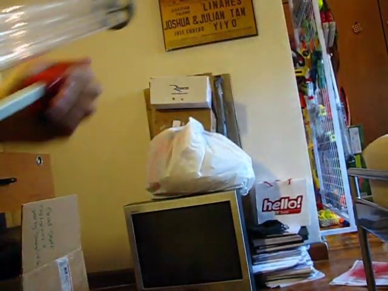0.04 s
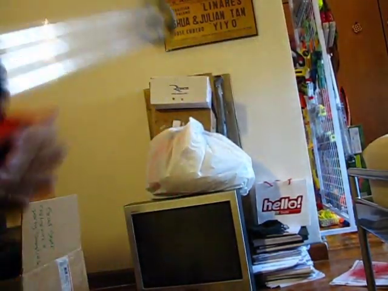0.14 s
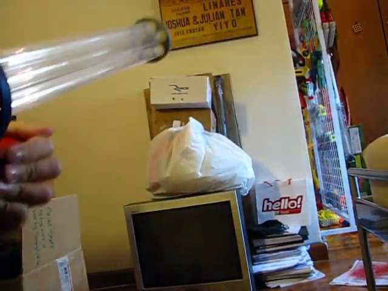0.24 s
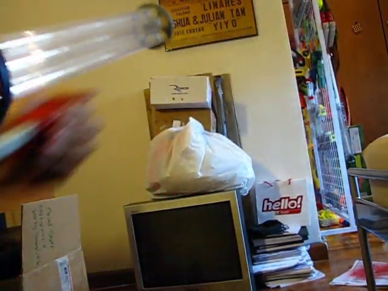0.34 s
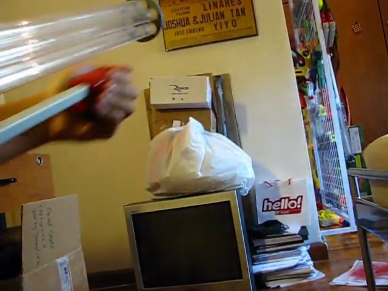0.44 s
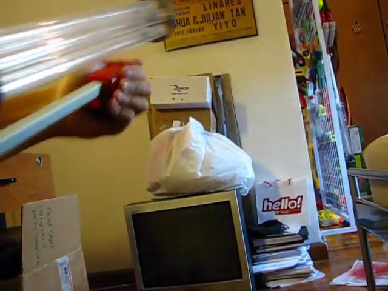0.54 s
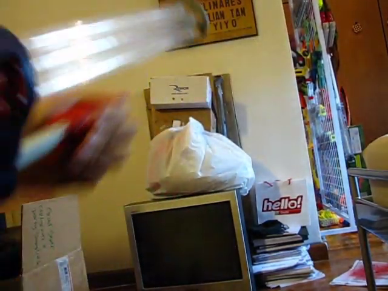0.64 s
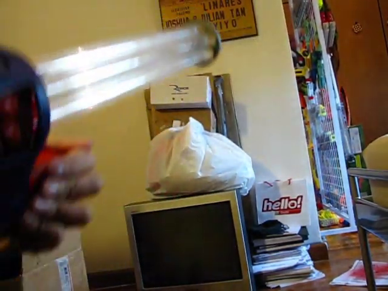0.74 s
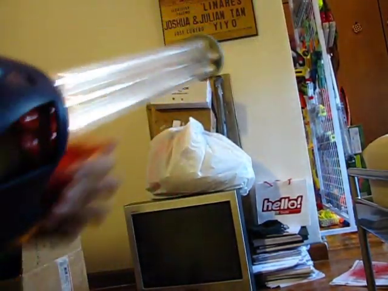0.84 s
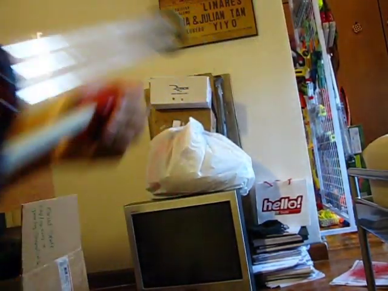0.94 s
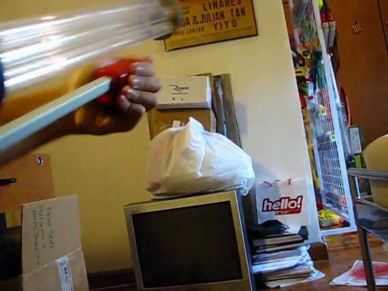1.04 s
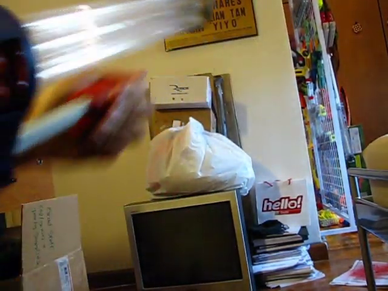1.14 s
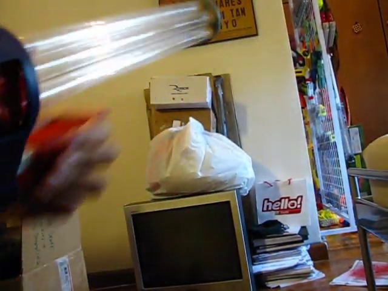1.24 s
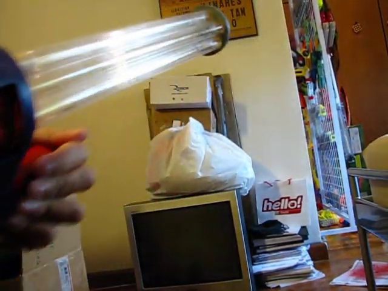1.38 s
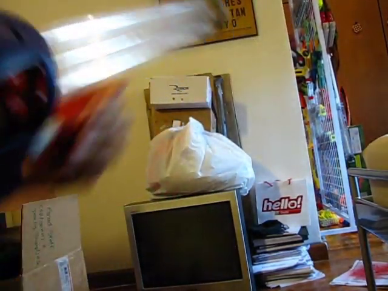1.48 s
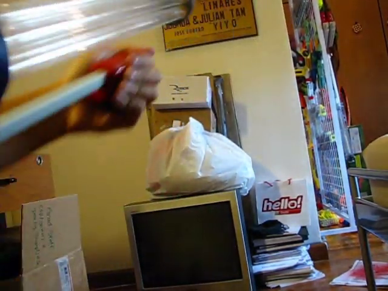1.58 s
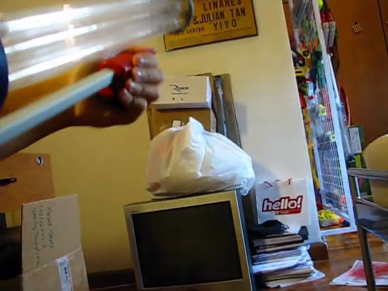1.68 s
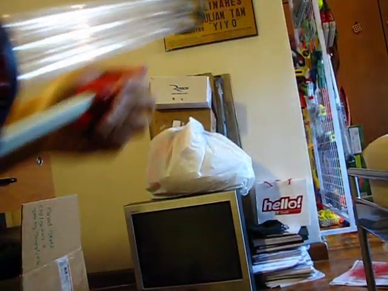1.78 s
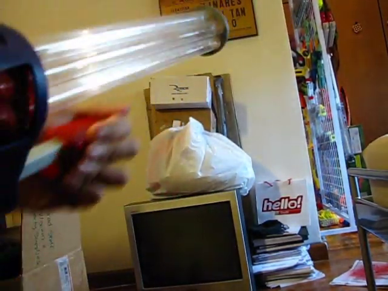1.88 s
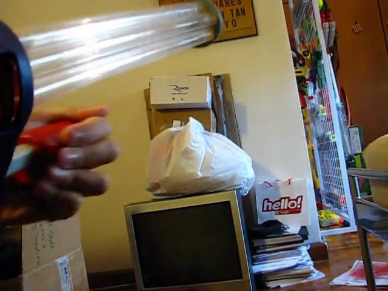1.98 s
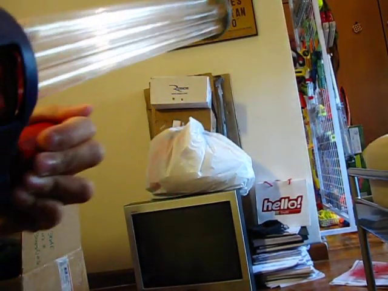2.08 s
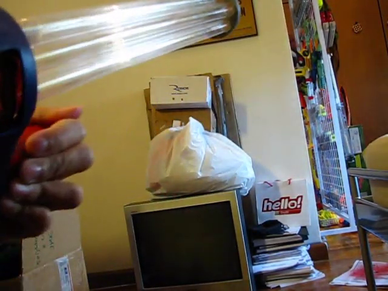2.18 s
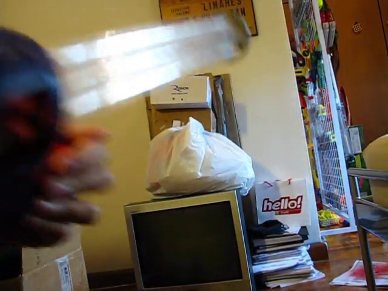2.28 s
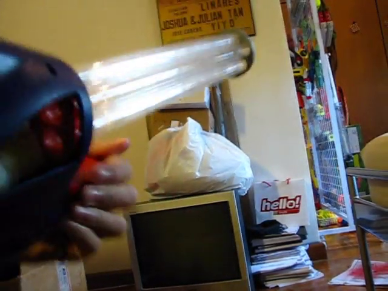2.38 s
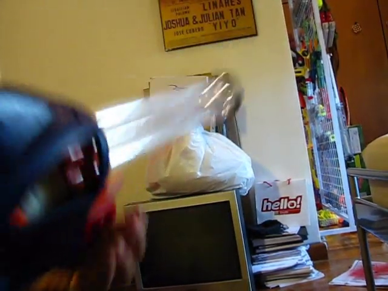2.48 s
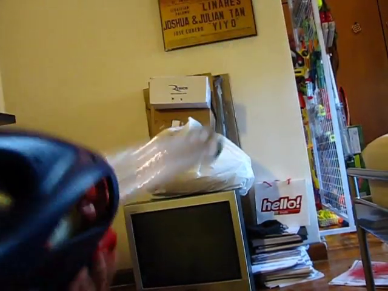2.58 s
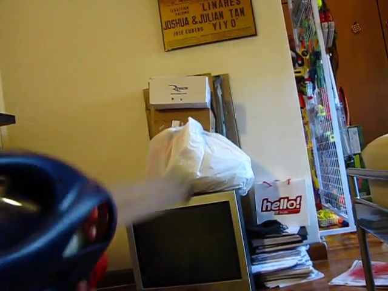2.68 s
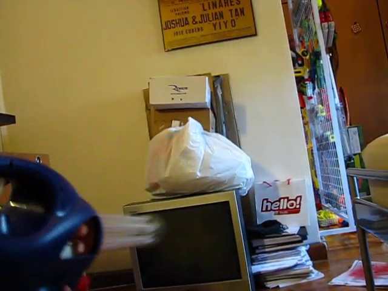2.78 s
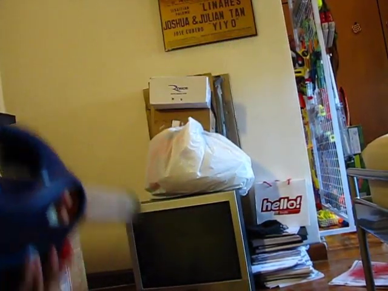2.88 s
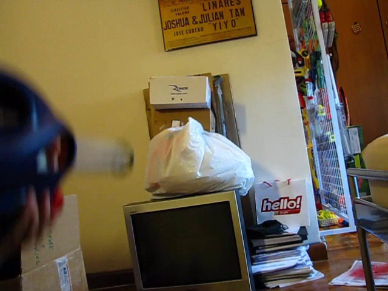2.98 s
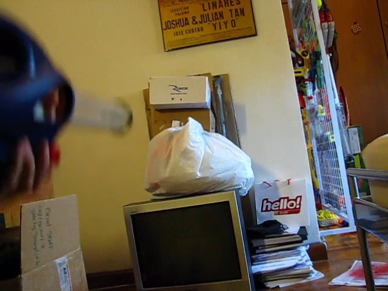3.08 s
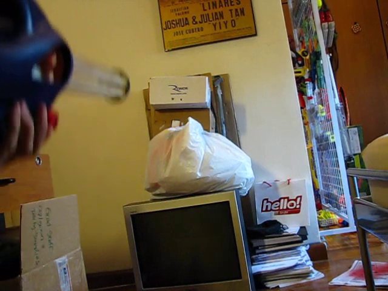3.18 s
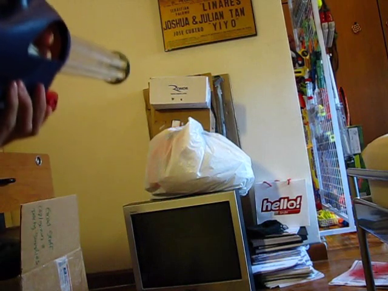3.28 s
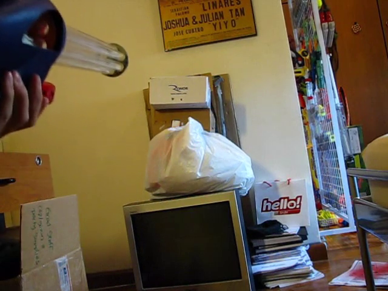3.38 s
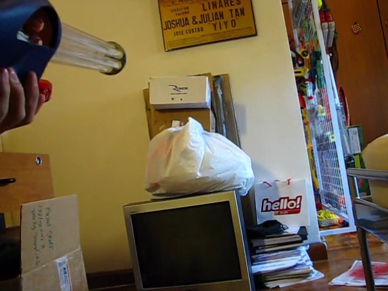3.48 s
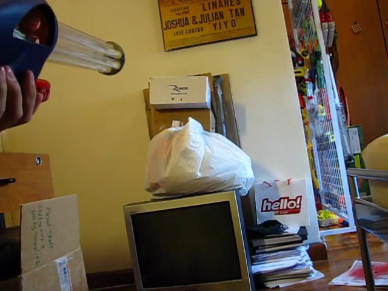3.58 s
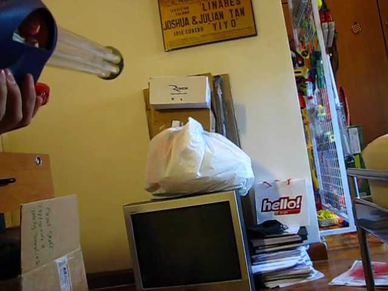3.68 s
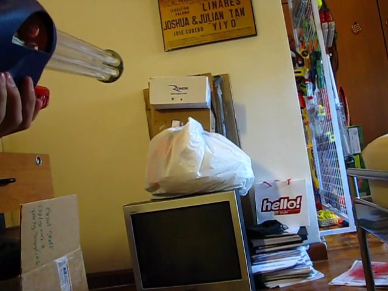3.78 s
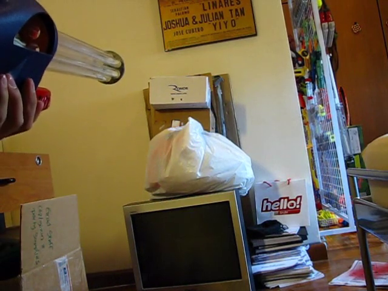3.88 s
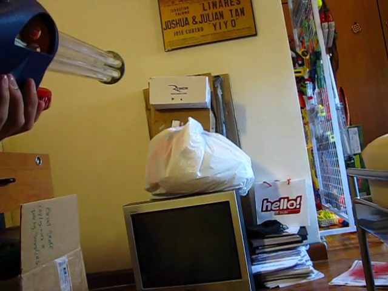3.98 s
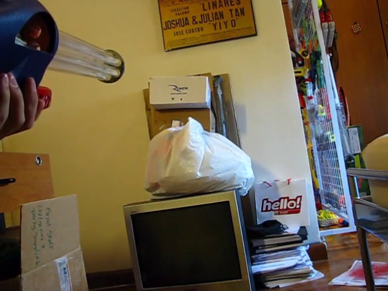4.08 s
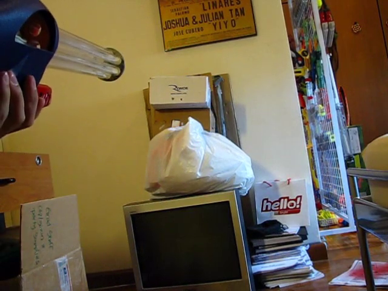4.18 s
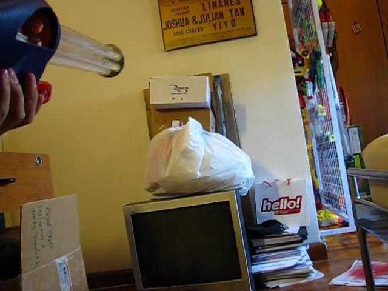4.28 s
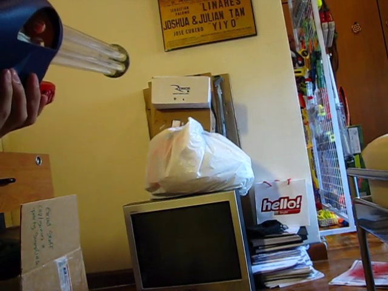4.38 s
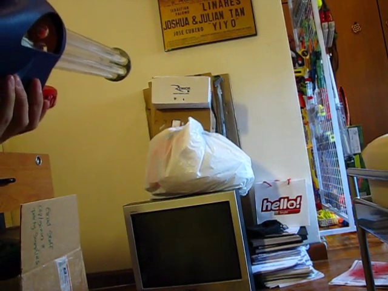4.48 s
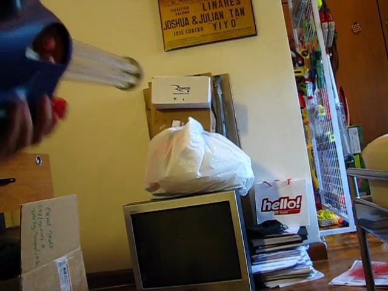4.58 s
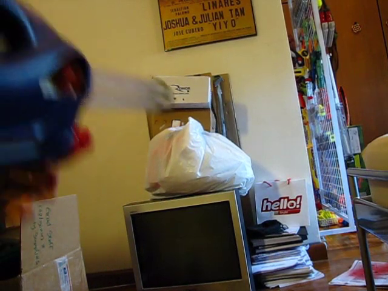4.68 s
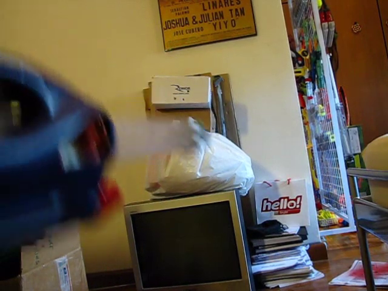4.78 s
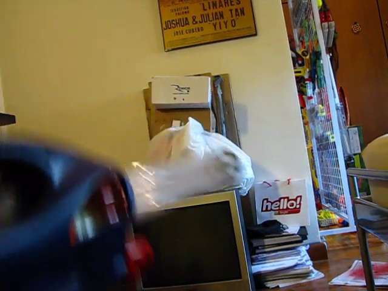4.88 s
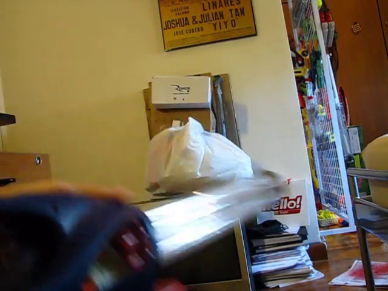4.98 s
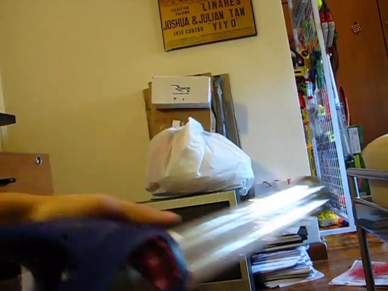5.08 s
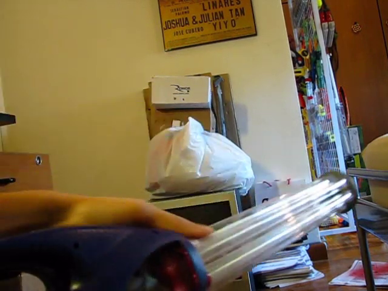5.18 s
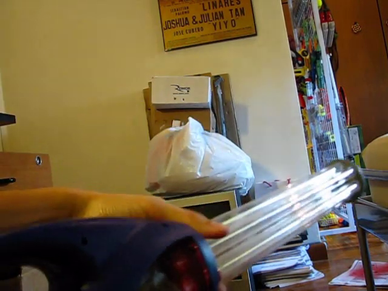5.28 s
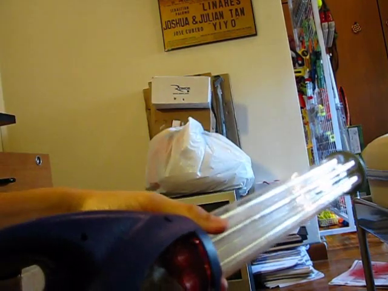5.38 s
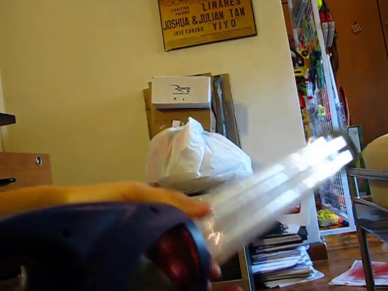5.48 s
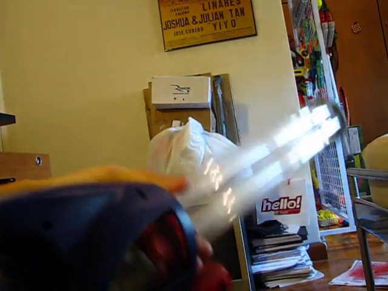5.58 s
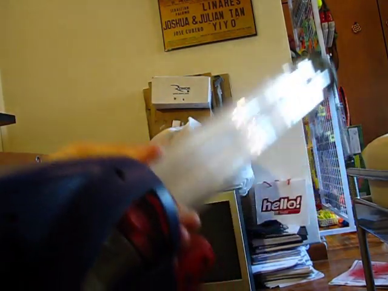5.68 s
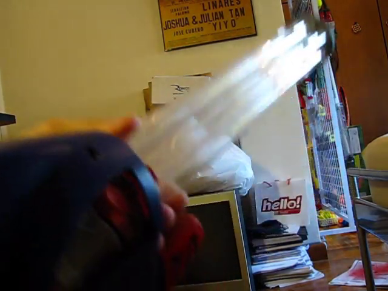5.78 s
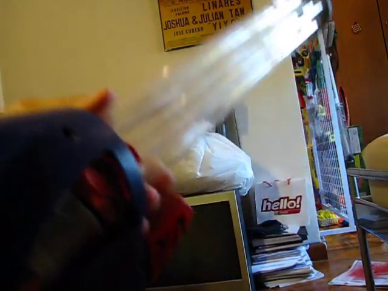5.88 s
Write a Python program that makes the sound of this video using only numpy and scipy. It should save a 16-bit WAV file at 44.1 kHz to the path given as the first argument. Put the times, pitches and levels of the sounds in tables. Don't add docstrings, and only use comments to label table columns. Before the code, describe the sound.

Close plastic rattling, hissing piston strokes and small squeaks, a quiet pause, one loud popping burst of air, then a stiff snap.

```python
import sys
import numpy as np
from scipy import signal
from scipy.io import wavfile

SR = 44100
rng = np.random.default_rng(int(sys.argv[2]) if len(sys.argv) > 2 else 0)


def volts_from_decibels(level):
    exponent = np.asarray(level, float) / 20
    return 10 ** exponent


def wav_record(signal):
    frames = np.transpose(np.atleast_2d(signal))
    bounded = np.clip(frames, -1, 1)
    quanta = np.round(bounded * 32767).astype(np.int16)
    wavfile.write(sys.argv[1], SR, quanta)


N = 261938
TIME = np.arange(N) / SR

# f/Hz, level/dB, t60/s
SHELL = [(340, -11.5, 0.18), (587.3, 8, 0.091), (636, 1.5, 0.1), (892, 15, 0.036), (1072, -6.5, 0.17)]
# f/Hz, level/dB, t60/s
RIBS = [(1330, 5, 0.023), (1700, 1.5, 0.059), (2093, 21.5, 0.023), (2622, 14.5, 0.052), (2850, 0.5, 0.027),
        (3500, 13, 0.043)]
# t/s, lag/samples
RIGHT_LAG = [(0, 4), (2.7, 4), (3.7, 2.5), (4.3, 1), (5.94, 0)]


def rms_one(x):
    return x / np.sqrt(np.mean(x ** 2) + 1e-20)


def in_time(rows):
    return np.interp(TIME, *np.transpose(rows))


def at_hz(points, hz):
    return np.interp(np.log(hz), np.log(np.array(points)[:, 0]), np.array(points)[:, 1])


def band_pass(low_hz, high_hz, x):
    return signal.sosfilt(signal.butter(2, [low_hz, high_hz], "band", fs=SR, output="sos"), x)


def high_pass(order, hz, x):
    return signal.sosfilt(signal.butter(order, hz, "high", fs=SR, output="sos"), x)


def drift(rate):
    r = np.exp(-80 * np.pi * rate / SR)
    slow = signal.lfilter([1], [1, -2 * r, r * r], rng.standard_normal(N // 40 + 2002))[2000:]
    return np.interp(np.arange(N) / 40, np.arange(len(slow)), rms_one(slow))


def ring(clicks, hz, t60):
    r = volts_from_decibels(-60 / (t60 * SR))
    w = 2 * np.pi * hz / SR
    return signal.lfilter([0, np.sin(w)], [1, -2 * r * np.cos(w), r * r], clicks + 1e-18)


def bands(spectrum, patchy_db, splits_hz, size=N, dying=False):
    # f/Hz, left-right likeness
    likeness = [(60, 0.94), (150, 0.99), (300, 1), (600, 0.87), (1000, 0.81), (2000, 0.83), (4000, .08),
                (12000, 0.05)]
    # f/Hz, t60/s
    room_t60 = [(100, .4), (1000, .42), (4000, .4), (8000, .34), (15000, .25)]
    out = np.zeros((3, 2, size))
    edges = 20 * 2 ** np.arange(0, 9.8, .5)
    white = rng.standard_normal((2, 2, size))
    for k, (low, high) in enumerate(zip(edges, edges[1:])):
        mid, side = band_pass(low, high, white[k % 2])
        hz = np.sqrt(low * high)
        alike = np.clip(at_hz(likeness, hz), 0, 1)
        gain = volts_from_decibels(at_hz(spectrum, hz) + patchy_db * drift(22)[:size])
        if dying:
            gain = gain * volts_from_decibels(-60 * TIME[:size] / at_hz(room_t60, hz))
        stereo = np.sqrt(1 + alike) * mid + np.sqrt(1 - alike) * side * [[1], [-1]]
        out[np.searchsorted(splits_hz, hz)] += gain * stereo
    return out if dying else np.array([rms_one(group) for group in out])


def hum():
    # f/Hz, level/dB per Hz
    colour = [(12, -32), (20, -6.5), (44, 5), (74, -24), (107, 4.5), (146, -69), (293, -1), (377, -9.5),
              (422, -10), (624, -20.5), (1090, -24.5), (1480, -23.5), (4060, -29.5), (7950, -37),
              (16000, -40)]
    # t/s, level/dB
    agc = [(0.0, -63.5), (0.5, -65), (1.14, -61.5), (1.47, -64), (1.93, -62.5), (2.73, -63), (3.39, -62),
           (3.61, -56.5), (3.9, -58.5), (4.37, -58.5), (4.5, -68), (4.65, -68), (4.8, -72), (5.14, -69.5),
           (5.4, -65.5), (5.61, -59), (5.77, -61.5), (5.94, -81)]
    # t/s, level/dB, width/s
    gusts = [(1.14, 3.5, 0.19), (2.58, 3.5, 0.24), (3.861, 2.5, 0.15), (5.6, -3, 0.27), (5.94, -10, 0.19)]
    # f/Hz, width/Hz, level/dB, throb/Hz
    whines = [(1500, 400, -5, 0), (4850, 700, -13, 24), (7870, 40, -24, 0), (10600, 300, -23, 0),
              (15700, 30, -33, 0), (335, 120, -1, 0), (5600, 700, -17, 0)]
    mean_db = -62
    gain_db = in_time(agc) - mean_db
    gusts_db = sum(db * np.exp(-((TIME - s) / width_s) ** 2) for s, db, width_s in gusts)
    rumble_db = -63 + 0.71 * gain_db + gusts_db
    hiss_db = -65.5 + 0.44 * gain_db
    levels = volts_from_decibels(np.array([rumble_db, mean_db + gain_db, hiss_db]))
    groups = bands(colour, patchy_db=.6, splits_hz=[140, 600])
    for hz, width_hz, level_db, throb in whines:
        pulses = volts_from_decibels(level_db + 6 * np.sin(2 * np.pi * throb * TIME) * (throb > 0))
        if hz == whines[0][0]:
            pulses = pulses * volts_from_decibels(8.5 * np.exp(-((TIME - 5.57) / 0.22) ** 2))
        noise = rng.standard_normal((2, N))
        groups[2] += pulses * rms_one(band_pass(hz - width_hz / 2, hz + width_hz / 2, noise))
    return np.sum(levels[:, None] * groups, axis=0)


def room(x):
    # f/Hz, level/dB
    colour = [(100, -6), (1000, 0), (6000, -1.5), (15000, -3)]
    size = SR // 2
    tail = bands(colour, patchy_db=0.2, splits_hz=[700, 5000], size=size, dying=True).sum(axis=0)
    tail = tail * np.clip((TIME[:size] - .003) / .034, 0, 1)
    return signal.fftconvolve(x[None], tail / np.sqrt(np.sum(tail ** 2) / 2), axes=1)[:, :N]


def slam_echoes():
    # t/s, level/dB
    sends = [
        (4.346, 1),
        (5.7493, -5),
    ]
    s, db = np.transpose(sends)
    clicks = np.zeros(N)
    clicks[(s * SR).astype(int)] = volts_from_decibels(db)
    return band_pass(900, 6500, clicks)


def thumps():
    # t/s, level/dB, start f/Hz, end f/Hz, t60/s
    pushes = [(0.99, -47.5, 143, 112, 0.12), (1.52, -35, 370, 367, 0.075), (2.393, -42, 83, 68.3, 1),
              (2.392, -40, 189, 151, 0.29), (2.398, -44, 128, 114, 0.28), (4.3446, -13, 365, 60, 0.048)]
    # t/s, level/dB, f/Hz, t60/s
    springs = [(5.752, -39, 2610, .55), (5.752, -42, 2540, .35), (5.75, -31, 528, .09),
               (5.75, -30, 824, .07), (5.75, -34, 1572, .04), (0.255, -25, 870, .05), (3.553, -43, 330, .1),
               (0.255, -27, 585, .09), (1.74, -36, 310, .08), (3.618, -46, 855, .25),
               (3.617, -38, 640, .06), (3.617, -45, 330, .12), (5.533, -44, 720, .05)]
    out = np.zeros(N)
    for s, level_db, start_hz, end_hz, t60 in pushes:
        t = np.clip(TIME - s, 0, None)
        pitch = end_hz + (start_hz - end_hz) * np.exp(-t / (0.065 * t60))
        out -= volts_from_decibels(level_db - 60 * t / t60) * np.sin(2 * np.pi * np.cumsum(pitch * (t > 0)) / SR)
    rings = np.zeros(N)
    for s, level_db, hz, t60 in springs:
        t = np.clip(TIME - s, 0, None)
        level = volts_from_decibels(level_db - 60 * t / t60 + 2.5 * drift(160))
        rings += level * np.sin(2 * np.pi * hz * t + .8 * drift(60)) * (1 - np.exp(-t / .002))
    return out + high_pass(3, 250, rings)


def squeaks():
    # t/s, slip rate f/Hz, level/dB
    glides = [
        [(0.143, 1350, -46), (0.152, 1470, -35), (0.163, 1650, -27), (0.169, 1760, -17.5), (0.174, 1860, -25),
         (0.181, 2000, -25), (0.187, 2120, -36)],
        [(0.188, 1150, -38), (0.202, 1194, -38.5), (0.234, 1225, -41), (0.252, 1290, -45)],
        [(0.735, 1190, -44), (0.753, 1195, -43), (0.819, 1295, -42), (0.84, 1400, -46)],
        [(1.295, 1204, -50), (1.337, 1230, -41), (1.371, 1308, -34), (1.385, 1360, -52)],
        [(2.062, 1390, -47), (2.096, 1412, -40), (2.116, 1428, -42), (2.15, 1439, -47), (2.178, 1478, -52),
         (2.2, 1545, -51), (2.223, 1614, -49), (2.233, 1628, -52)],
    ]
    # overtones under fundamental/dB, fall/dB per multiple, growth/dB per s
    edges = [(-9, -2, -200), (-12, 0, 120), (-10, 0, 0), (-11, -.8, -50), (-10.5, .45, 60)]
    # f/Hz, level/dB
    tube_colour = [(2600, 5), (4300, -3), (5500, 7), (7200, -1), (8600, -7), (10500, 0), (12500, -8),
                   (15000, -16)]
    out, jitter = np.zeros(N), drift(92)
    for rows, (edge_db, tilt_db, growth_db_s) in zip(glides, edges):
        s, hz, level_db = np.transpose(rows)
        span = (TIME > s[0]) & (TIME < s[-1])
        t = TIME[span]
        pitch = np.interp(t, s, hz) * (1 + .001 * jitter[span])
        turn = 2 * np.pi * np.cumsum(pitch) / SR
        upper = 0
        for k in range(2, 12):
            flicker_db = 1.5 * np.roll(jitter, 900 * k)[span]
            level = volts_from_decibels(at_hz(tube_colour, k * pitch) + tilt_db * (k - 2) + flicker_db)
            upper = upper + level * np.sin(k * turn + k * k) * (k * pitch < 16000)
        edge = volts_from_decibels(edge_db + growth_db_s * (t - t.mean()))
        stack = volts_from_decibels(np.interp(t, s, level_db)) * (np.sin(turn) + edge * upper)
        out[span] += np.sqrt(2) * stack * signal.windows.tukey(len(t), .15)
    return out


def slides(rows, rise_db_s, sag_db_s, fall_db_s):
    out = 0
    for s, held_s, level_db, hiss_db, rub_db in rows:
        t, held_s = TIME - s, abs(held_s)
        speed_db = rise_db_s * np.minimum(t, 0) - sag_db_s * np.clip(t, 0, held_s)
        speed_db = speed_db - fall_db_s * np.maximum(t - held_s, 0)
        bite_db = 0.97 * speed_db + 900 * np.minimum(t + 0.047, 0)
        seal_db = np.where(t < 0, bite_db, 1.3 * speed_db)
        out = out + volts_from_decibels(level_db + np.array([speed_db, hiss_db + seal_db, rub_db + speed_db])) ** 2
    return out


def strokes():
    # full speed t/s, held/s, scraping level/dB, hiss over it/dB, rubbing over it/dB
    piston = [(0.002, 0.023, -44, -10, -16), (0.16, 0.053, -35, -7.5, -16), (0.465, 0.042, -42, -8.5, -35),
              (0.668, 0.14, -42.5, -4.5, -10.5), (0.958, 0.094, -38, -9.5, -13.5),
              (1.205, 0.21, -41, -5.5, -13), (1.6, 0.09, -41.5, -7.5, -19), (1.84, 0.096, -42.5, -6, -10.5),
              (2.09, 0.11, -48, -4.5, -12.5)]
    # t/s, held/s, scraping level/dB, hiss over it/dB, rubbing over it/dB
    hands = [(0.385, 0.058, -48.5, -10.5, -8.5), (1.487, 0.0066, -40.5, -21, -9.5),
             (2.275, 0.0094, -43.5, -53, -21), (2.434, 0.011, -54.5, -3.5, -5),
             (2.672, 0.037, -60, -6, -32.5), (2.754, 0.0073, -56.5, -8, -26), (3.3, 0.0076, -63.5, -7, -6),
             (3.407, 0.015, -53, -14.5, -12), (3.5, 0.073, -67.5, -24, 9.5), (3.627, .04, -63, -22.5, -4.5),
             (5.01, .04, -76.5, 2, -13), (5.15, 0.026, -76.5, -2, -16), (5.29, 0.027, -72.5, -4, -18),
             (5.532, 0.0087, -56, -11, -11), (5.695, 0.015, -52.5, -8, -10)]
    # f/Hz, level/dB per Hz
    hiss_colour = [(710, -43), (1200, -13), (1680, 0.5), (2530, -7), (3100, -4.5), (4300, -5), (6100, -11),
                   (8600, -13), (12000, -15.5), (16000, -28)]
    powers = slides(piston, rise_db_s=259.5, sag_db_s=22.5, fall_db_s=137)
    powers = powers + slides(hands, rise_db_s=437, sag_db_s=24, fall_db_s=86)
    scrape, hiss, rub = np.sqrt(powers)
    scrape = scrape * volts_from_decibels(1.5 * drift(83))
    hiss = hiss * volts_from_decibels(1.5 * drift(120))

    def grains(per_s):
        return (rng.random(N) < per_s / SR) * rng.standard_normal(N) * volts_from_decibels(4 * drift(35))

    shell = rms_one(sum(volts_from_decibels(db) * ring(grains(2500), hz, t60 * .8) for hz, db, t60 in SHELL[1:]))
    ribs = rms_one(sum(volts_from_decibels(db) * ring(grains(3700), hz, t60 * 0.18) for hz, db, t60 in RIBS))
    _, middle, top = bands(hiss_colour, patchy_db=.6, splits_hz=[1100, 5200])
    tube_hz, tube_width_hz = 5664, 780
    noise = rng.standard_normal((2, N))
    tube = rms_one(band_pass(tube_hz - tube_width_hz / 2, tube_hz + tube_width_hz / 2, noise))
    top = top + volts_from_decibels(-6.5 + 6.3 * drift(30)) * tube
    air = scrape * volts_from_decibels(-2.5) * middle + hiss * volts_from_decibels(1.5) * top
    body = high_pass(2, 330, rub * volts_from_decibels(3) * shell + scrape * volts_from_decibels(-5.5) * ribs)
    return body, air * volts_from_decibels([[1.2], [-1.2]])


def contacts():
    # t/s, strength level/dB, hollowness/dB, sharpness/dB
    pump_knocks = [(0.0224, -18.5, -4.5, -19.5), (0.142, -40, 1.5, -27), (0.196, -41, -4, -30),
                   (0.225, -39, 0, -30), (0.2533, -16, -4, -12.5), (0.3209, -32, -7, -48),
                   (0.4213, -31.5, -13, -29), (0.5636, -34, -3, -5), (0.5865, -22, -13, -47),
                   (0.6898, -36.5, 2, -16), (0.8008, -28.5, -6.5, -22), (0.8117, -23, -15, -10),
                   (0.817, -29, -8, -13), (0.9812, -29, -8, -32), (1.1533, -45, 2.5, -15),
                   (1.2235, -32, -1.5, -22), (1.295, -33.5, -2.5, -25), (1.3591, -21, -13, 1),
                   (1.3911, -44, 4.5, -11), (1.4196, -25, -14, 0), (1.483, -32.5, -21, -0.5),
                   (1.4922, -35.5, -16, 0), (1.5183, -27.5, -13, -1.5), (1.5551, -28.5, -12, -2.5),
                   (1.7362, -27, -22, -44), (1.7395, -21.5, -11.5, -56), (1.8623, -57, 21.5, -20),
                   (1.997, -30.5, -7.5, -7), (2.0132, -36.5, 1, -32), (2.1814, -28.5, -15, -23),
                   (2.1883, -33, 0, -20), (2.2275, -24, -12.5, -20), (2.2575, -20, -15, -1)]
    # t/s, strength level/dB, hollowness/dB, sharpness/dB
    grip_taps = [(2.3156, -52, 1, -20), (2.3394, -47.5, 2, -2), (2.364, -37, -22, -17),
                 (2.3851, -22, -12.5, -8), (2.4381, -36, -7.5, -32), (2.4508, -34, -8, -38),
                 (2.528, -58, 10, 9), (2.7484, -42, -7.5, -9.5), (2.8325, -48.5, -7, -9),
                 (3.2461, -53.5, 0, -40), (3.2927, -45.5, -26, -0.5), (3.3936, -30, -7.5, -12.5),
                 (3.3999, -41.5, 1.5, -18), (3.469, -52, 4.5, -24), (3.525, -51, 16, -17),
                 (3.5513, -52.5, 12.5, -18), (3.6143, -39.5, 9, -25), (4.248, -48.5, 2, -33.5),
                 (4.8615, -52, -4.5, -17), (5.518, -50, -3, -26), (5.531, -42.5, 1.5, -16),
                 (5.68, -34, -33, -18.5), (5.707, -45, -21, -26)]
    # t/s, strength level/dB, hollowness/dB, sharpness/dB
    firing = [
        (4.3063, -31.5, 7, -23),
        (4.3098, -38, 8.5, -27.5),
        (4.3135, -49, 6, -28.5),
        (4.3254, -34.5, -4, -8),
        (4.3412, -36.5, 7, -28.5),
        (4.368, -16, -16.5, -12),
    ]
    out = []
    for rows, room_db in [(pump_knocks, 33), (grip_taps, 14.5), (firing, 19)]:
        for s, db, hollow_db, sharp_db in rows:
            shell_db, ribs_db = db + hollow_db + 3, db - 2.5
            snap_db, crack_db = db + 0.47 * sharp_db + 3.5, db + sharp_db + 2.45
            heard_db = max(shell_db, ribs_db, snap_db) + room_db + 0.28 * sharp_db
            out.append([s, heard_db, shell_db, ribs_db, snap_db, crack_db])
    return np.array(sorted(out))


def knocks():
    # f/Hz, level/dB, t60/s
    snap = [(3820, -2.5, 0.062), (4960, 1, 0.018), (5380, 6, 0.028), (5690, -14.5, 0.0029)]
    # f/Hz, level/dB, t60/s
    crack = [(7130, -8.5, 0.0096), (9300, -3, 0.022), (11100, 8, 0.0066), (12900, -5.5, 0.0012)]
    rows, size = contacts(), 3000
    t, count = TIME[:size], len(rows)
    near, broad = np.zeros((2, count, size)), np.zeros((count, size))

    def unit(x):
        return x / np.sqrt(np.sum(x ** 2, axis=-1, keepdims=True))

    left_db = 1.3 * np.interp(rows[:, 0], *np.transpose(RIGHT_LAG)) - 1.5
    # modes, band in Hz, chatter s, share of plain chatter, stereo spread
    families = [(SHELL, [300, 1200], .006, .45, .5), (RIBS, [1200, 3800], .0035, 1.5, .7),
                (snap, [3800, 7000], .0035, 1.8, 1), (crack, [7000, 15800], .004, 2.5, 1.1)]
    for column, (modes, edges_hz, chatter_s, plain_share, spread) in enumerate(families, start=2):
        hz, level_db, t60 = np.transpose(modes)[:, None, :, None]
        luck = rng.standard_normal((count, 2, len(modes), 1))
        held_t60 = t60 * (.7 if column > 2 else 1)
        decay = volts_from_decibels(level_db + 1.5 * luck[:, 0] - 60 * t / held_t60)
        rings = decay * np.sin(2 * np.pi * hz * (1 + .04 * luck[:, 1]) * t)
        chatter = rng.standard_normal((count, size)) * volts_from_decibels(-30 * t / chatter_s) * (1 - np.exp(-t / .0004))
        body = unit(signal.fftconvolve(chatter[:, :600], rings.sum(axis=1), axes=1)[:, :size])
        strength = volts_from_decibels(rows[:, column, None] + 19.0)
        grains = strength * unit(body + plain_share * unit(band_pass(*edges_hz, chatter)))
        near += grains * volts_from_decibels(np.outer([.5, -.5], spread * left_db))[:, :, None]
        broad += (-1) ** column * strength * unit(band_pass(*edges_hz, signal.unit_impulse(size)))
    loudest_db = rows[:, 2:5].max(axis=1, keepdims=True)
    broad = unit(broad) * volts_from_decibels(np.minimum(rows[:, 1:2], loudest_db + 10))
    at = (rows[:, :1] * SR).astype(int) + np.arange(size)
    out = np.zeros((3, N + size))
    for line, grains in zip(out, (*near, broad)):
        np.add.at(line, at, grains)
    out = high_pass(3, 270, out[:, :N])
    return out[:2], out[2]


def slam(touches, modes):
    s, db = np.transpose(touches)
    out = np.zeros(N)
    for hz, level_db, t60 in modes:
        clicks = np.zeros(N)
        strengths = volts_from_decibels(db + level_db + 1.5 * rng.standard_normal(len(s)))
        clicks[(s * SR).astype(int)] = strengths * rng.choice([-1, 1], len(s))
        out += ring(clicks, hz, t60)
    return high_pass(2, 400, out)


def end_stop():
    # t/s, level/dB
    touches = [(0.0226, -23), (0.0236, -17), (0.2536, -21), (1.7364, -24.5), (1.7374, -30)]
    # f/Hz, level/dB, t60/s
    modes = [(1190, -17, 0.0083), (2110, 5.5, 0.012), (3070, -17, 0.0041), (4930, -13, 0.0088)]
    return slam(touches, modes)


def catch():
    # t/s, level/dB
    touches = [
        (5.7474, -29),
        (5.7483, -20),
        (5.7487, -12),
        (5.7496, -16.5),
        (5.7526, -33),
        (5.759, -54),
    ]
    # f/Hz, level/dB, t60/s
    modes = [(750, -9, 0.017), (1160, -19, 0.044), (1530, -25, .01), (1806, -6, 0.0066), (2620, 4.5, 0.007),
             (3490, 5, 0.0036), (4200, -8, 0.0046), (5050, -3.5, 0.0037), (5600, 4.5, 0.005),
             (6700, -2, 0.0037), (8100, -5, .004), (9330, -6, 0.0032), (13000, -4.5, 0.0041)]
    return slam(touches, modes)


def valve():
    # t/s, level/dB
    touches = [
        (4.3461, -18.5),
        (4.3472, -11.5),
        (4.3484, -17.5),
        (4.3498, -28.5),
    ]
    # f/Hz, level/dB, t60/s
    modes = [(606, -9, 0.062), (1660, 4.5, 0.0047), (2620, 1.5, 0.027), (3770, -7.5, 0.0068),
             (4470, -4, .006), (5510, -4.5, 0.017), (6850, -19.5, .006), (9270, -16.5, 0.0054)]
    return slam(touches, modes)


def blast():
    # t/s, level/dB, low over it/dB, high over it/dB, fall/dB per s
    bursts = [
        (4.345, -16, -5, -5, 598),
        (4.371, -19, -5, -7, 129.5),
    ]
    # f/Hz, level/dB per Hz
    colour = [(18, -52), (30, -32.5), (141, -18), (336, -8.5), (540, -9), (584, -2), (740, -13),
              (1190, -12), (3670, -13.5), (4420, -13.5), (5170, -19.5), (11700, -31.5), (16000, -19)]
    gains = 0
    for (s, db, low_db, high_db, fall_db_s), hold_s in zip(bursts, [0, 0.019]):
        fall_db = fall_db_s * np.clip(TIME - s - hold_s, 0, 1) * np.array([[1.105], [1], [0.99]])
        gains = gains + (TIME >= s) * volts_from_decibels(db + np.array([[low_db], [0], [high_db]]) - fall_db)
    air = np.sum(gains[:, None] * bands(colour, patchy_db=-0.5, splits_hz=[700, 5000]), axis=0)
    dull = signal.sosfiltfilt(signal.butter(2, 9500, fs=SR, output="sos"), air)
    return dull + (air - dull) * volts_from_decibels(-74.5 * np.clip(TIME - bursts[1][0], 0, 1))


def scene():
    hits, broad = knocks()
    sliding, air = strokes()
    near = sliding + squeaks()
    slams = valve() + catch()
    hits = hits + end_stop() * volts_from_decibels([[1.5], [-1.5]])
    wet = room(volts_from_decibels(-6) * broad + volts_from_decibels(-16) * near + slam_echoes() + volts_from_decibels(-32) * slams)
    pushes = thumps()
    lows = np.array([pushes, np.roll(pushes, 5)])
    return lows + hits + slams + near * volts_from_decibels([[1.0], [-1.0]]) + air + wet + blast() + hum()


def roll_off(x):
    return signal.sosfilt(signal.butter(12, 16950, fs=SR, output="sos"), x)


def record(dry):
    lag = in_time(RIGHT_LAG)

    def late(x, share):
        return x[np.clip(np.arange(N) - np.round(share * lag).astype(int), 0, None)]

    low = signal.sosfiltfilt(signal.butter(2, 3000, fs=SR, output="sos"), dry[1])
    right = late(low, 1) + volts_from_decibels(-.5 * lag) * late(dry[1] - low, .75)
    spaced = np.array([dry[0], right])
    rounded = signal.lfilter(*signal.butter(2, 15800.0, fs=SR), 1.2 * np.tanh(spaced / 1.2))
    mix = signal.sosfilt(signal.butter(12, 15900, fs=SR, output="sos"), rounded)
    return roll_off(mix)


dry = scene()
out = record(dry)
wav_record(out)
```